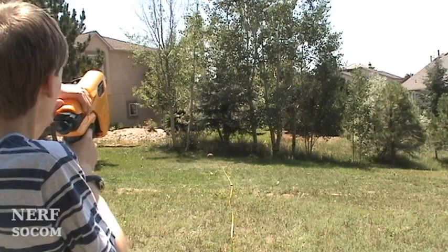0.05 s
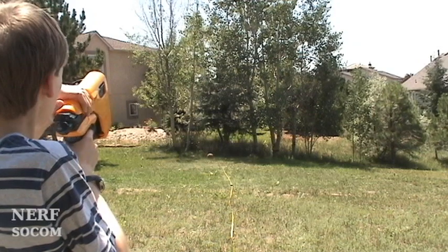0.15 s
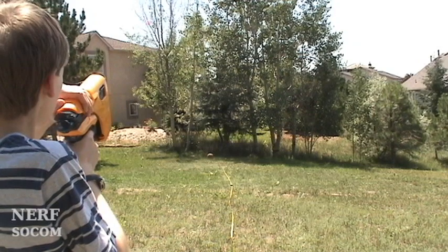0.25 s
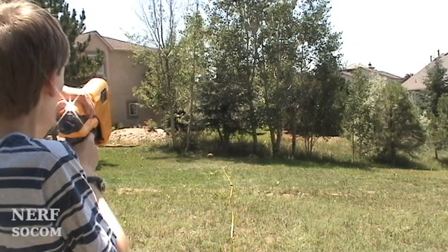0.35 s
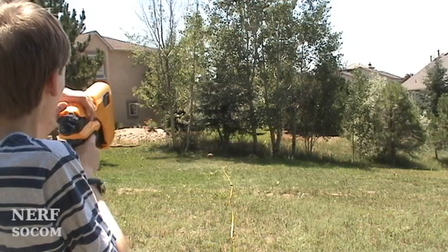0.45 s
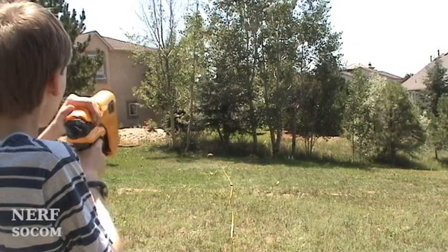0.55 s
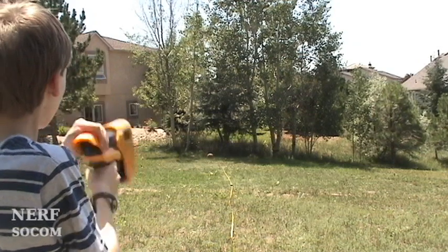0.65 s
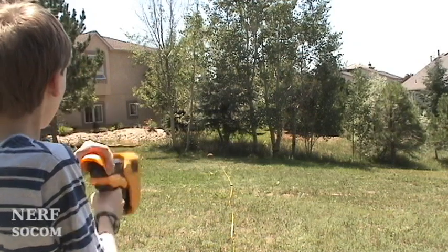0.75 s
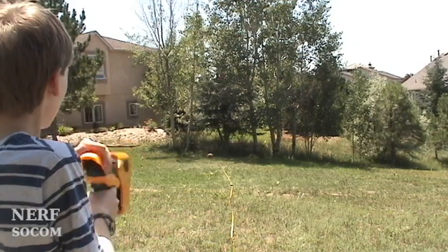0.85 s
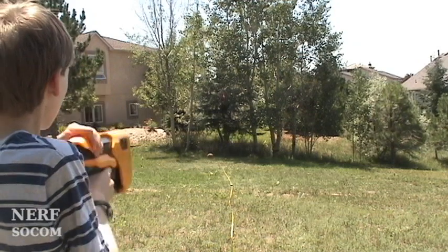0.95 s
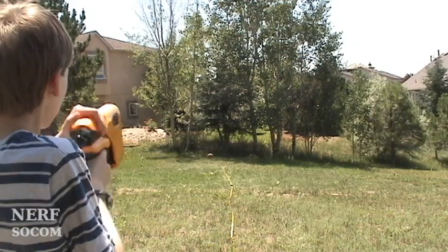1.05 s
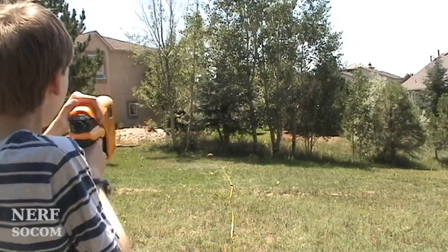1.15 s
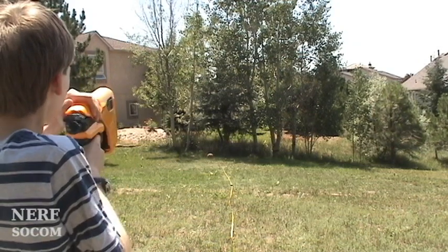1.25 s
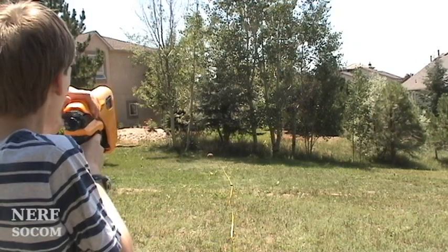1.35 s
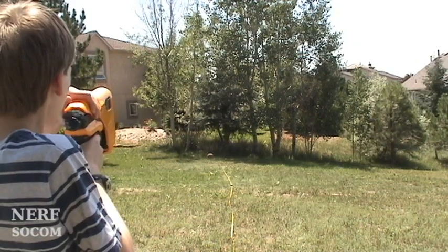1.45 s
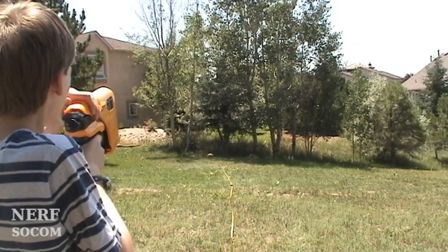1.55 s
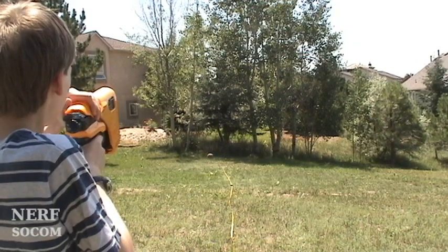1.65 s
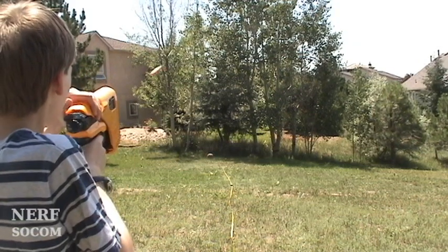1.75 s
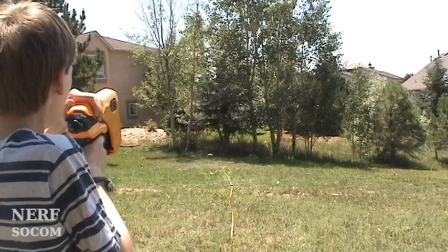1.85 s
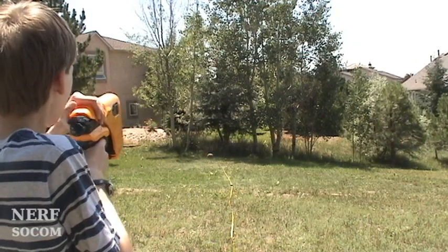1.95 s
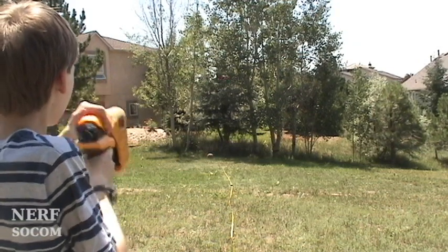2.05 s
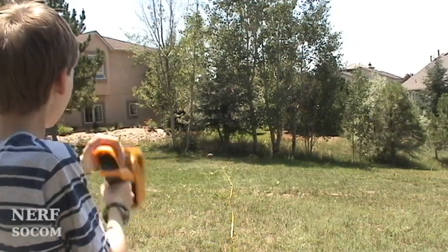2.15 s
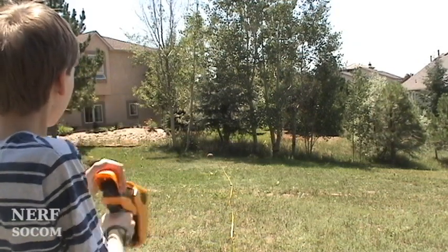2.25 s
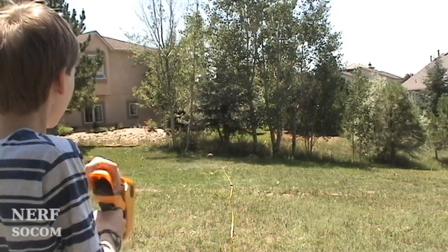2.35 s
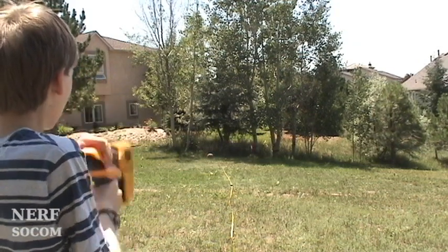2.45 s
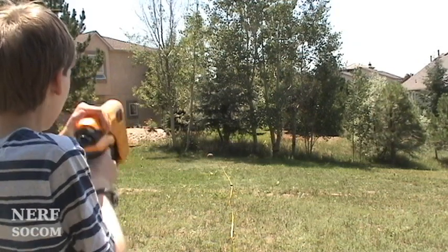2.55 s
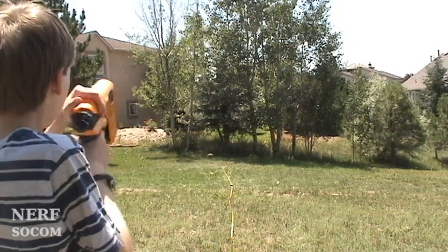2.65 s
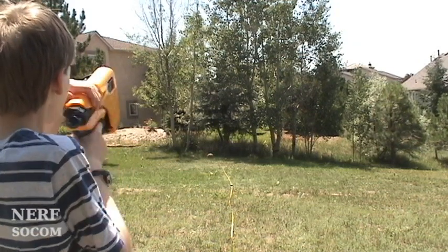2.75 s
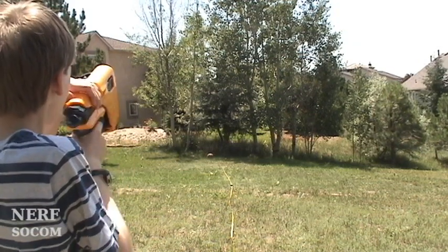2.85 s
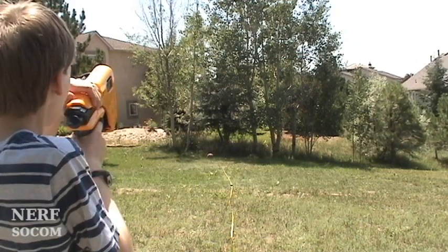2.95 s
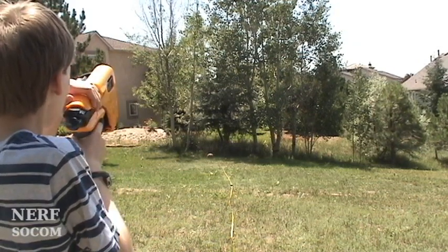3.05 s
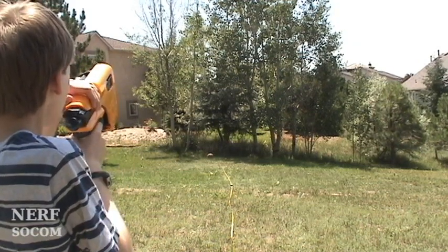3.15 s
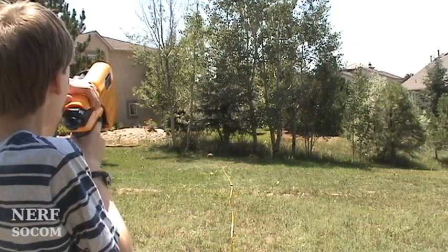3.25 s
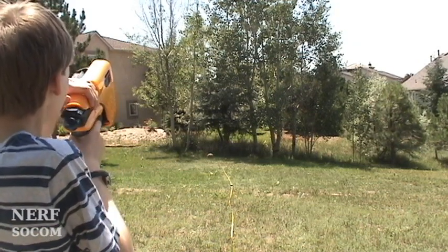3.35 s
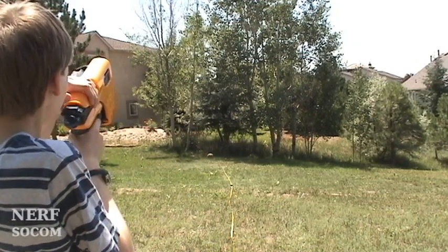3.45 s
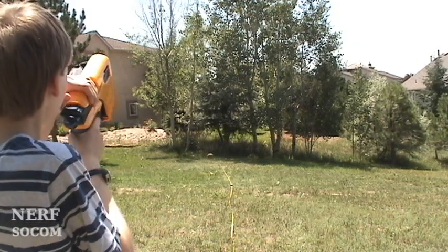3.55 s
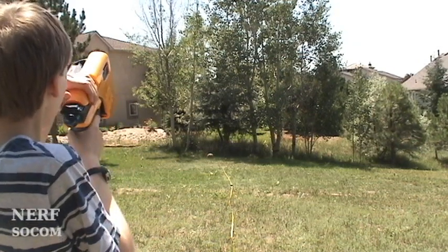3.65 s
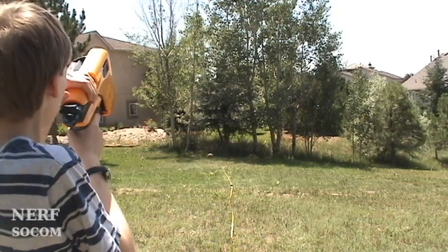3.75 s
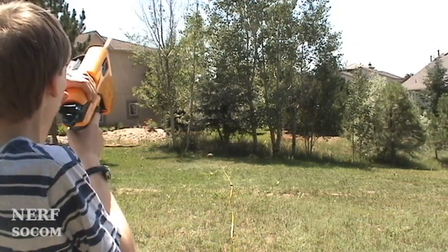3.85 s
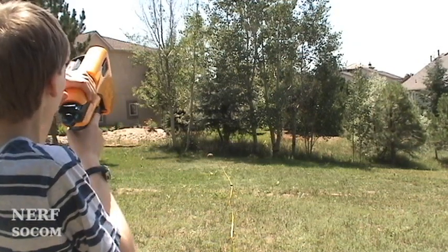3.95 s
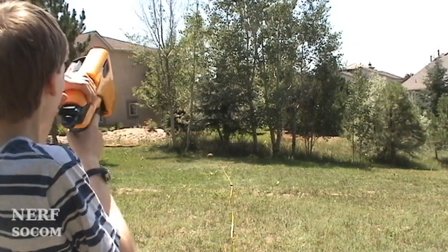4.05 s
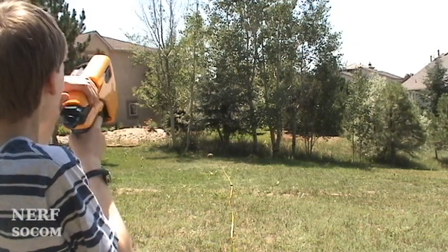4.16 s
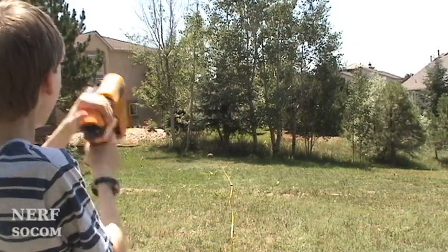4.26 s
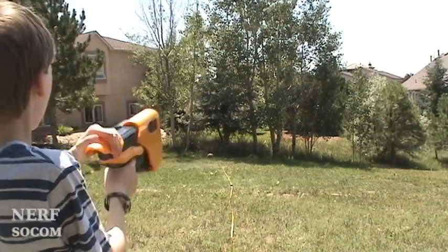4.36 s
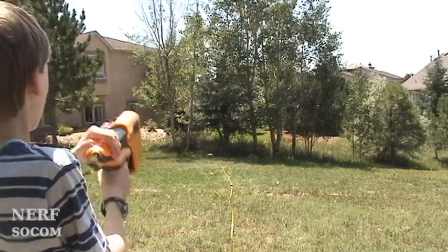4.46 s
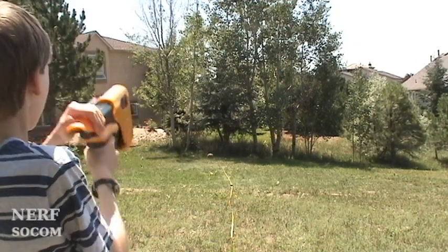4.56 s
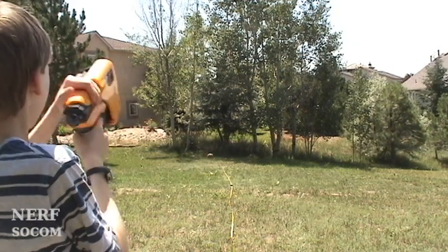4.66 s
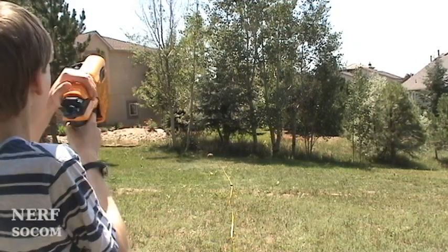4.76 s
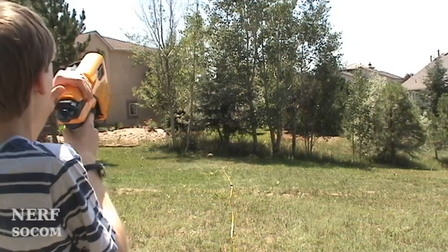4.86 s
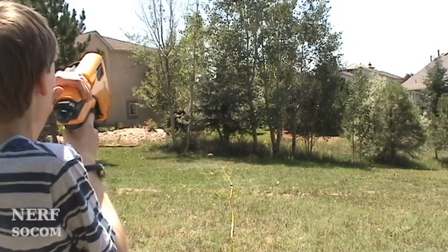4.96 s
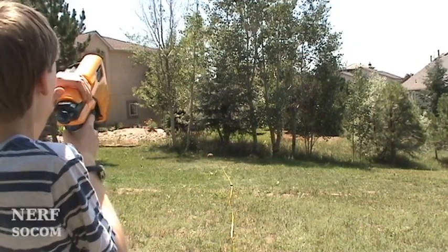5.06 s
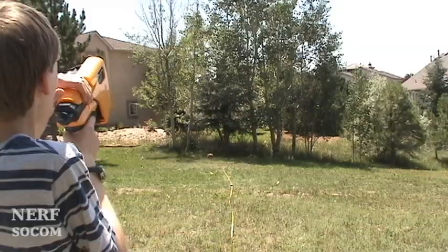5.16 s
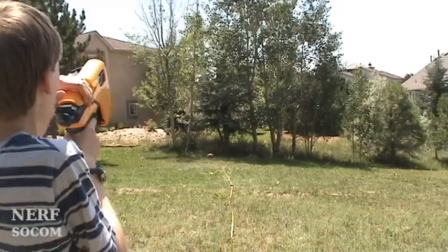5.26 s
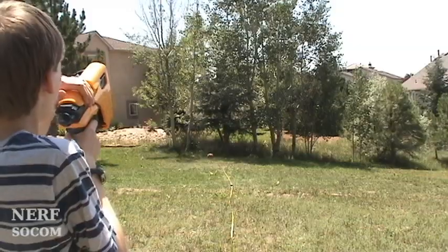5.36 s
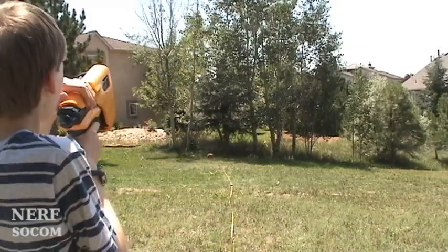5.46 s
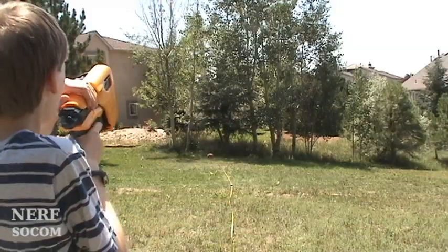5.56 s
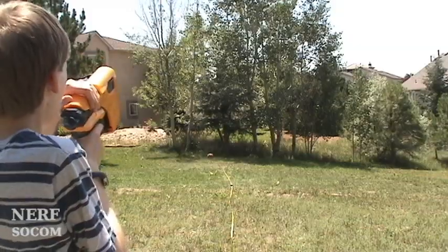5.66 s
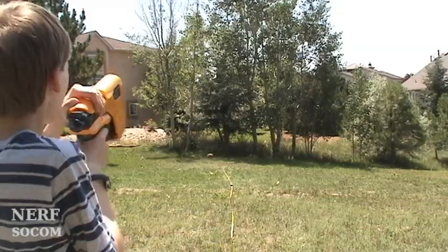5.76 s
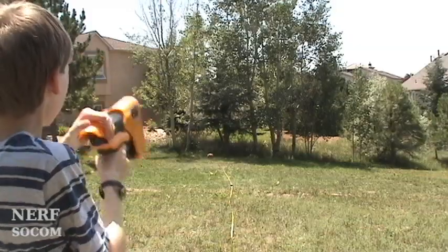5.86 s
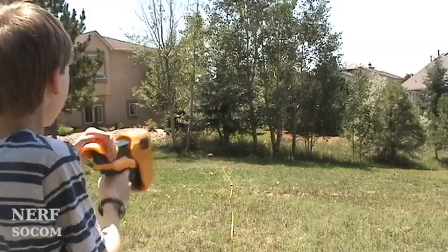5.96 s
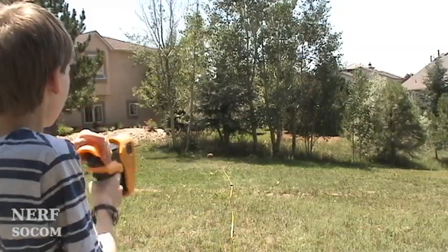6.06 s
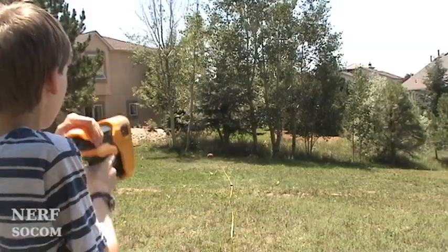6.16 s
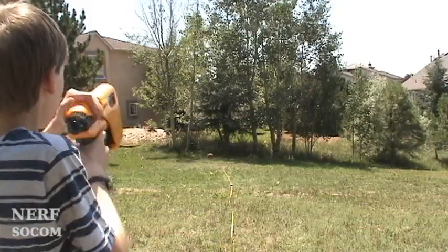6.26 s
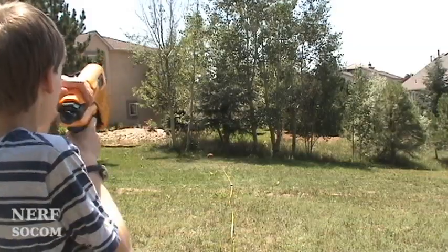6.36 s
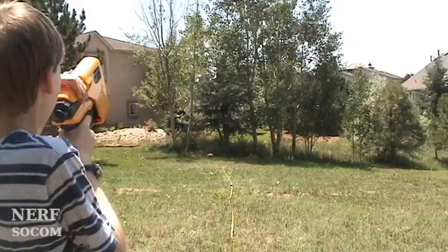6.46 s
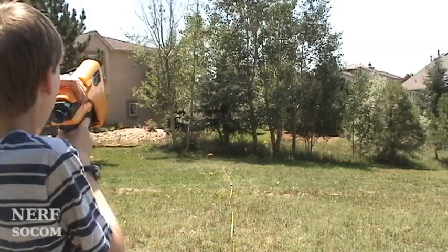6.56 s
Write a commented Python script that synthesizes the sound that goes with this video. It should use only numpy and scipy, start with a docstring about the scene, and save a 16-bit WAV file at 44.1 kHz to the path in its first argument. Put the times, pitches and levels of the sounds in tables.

```python
"""Plastic knocks and a pop of air: a spring-powered dart blaster on a lawn, a metre from the microphone.
It fires four times. The plunger strikes the hollow shell and drives out a dart, and three of the darts
whistle faintly away. After each shot the slide is pulled back and pushed home, scraping and clacking.
Trees and a house wall echo it, over a far hush, a faint hum and a light breeze on the microphone."""
import sys
import numpy as np
from scipy import signal
from scipy.fft import rfft, irfft
from scipy.io import wavfile
from scipy.ndimage import uniform_filter1d

SR = 44100
rng = np.random.default_rng(int(sys.argv[2]) if len(sys.argv) > 2 else 0)


def unload_wav(signal):
    """Save mono or channel-first audio to the path in sys.argv[1] as 16-bit WAV at rate SR, clipped to [-1, 1]."""
    wavfile.write(
        sys.argv[1],
        SR,
        np.round(np.clip(np.atleast_2d(signal).T, -1, 1) * 32767).astype(np.int16),
    )


N = 291060

# Trigger pulls. Each row: release in seconds, strength in dB, dart exit in seconds, air pop in dB,
# barrel pitch in Hz, then relative levels in dB of overtone, low thump and rebound.
SHOTS = [(.2092, -.5, .2205, -17.5, 555, -4, -32, 0), (1.727, -1, 1.741, -11.5, 585, -11, -26, -1),
         (3.8748, 0, 3.889, -13.5, 530, -1, -25.5, -9), (5.4958, 0, 5.511, -10.5, 560, -9, -25.5, -8)]
# Slide pulled back. Each row: unlatching, breech opening and spring catching in seconds,
# the strength of each in dB, rubbing in dB, cavity pitch in Hz.
PULLS = [(.6136, .666, .71, -1, -2.5, 1.5, -2, 460), (2.1328, 2.174, 2.207, -1.5, -.5, 0, 1, 465),
         (4.263, 4.315, 4.352, 1, 1.5, 0, .5, 580), (5.8272, 5.873, 5.9205, 0, 0, -3, .5, 583)]
# Slide pushed home. Each row: dart pickup, breech closing and locking in seconds,
# the strength of each in dB, rubbing in dB, cavity pitch in Hz.
PUSHES = [(1.009, 1.054, 1.089, -3, 1.5, -1, -2.5, 590), (2.509, 2.5369, 2.574, -2, -2, -.5, 1, 540),
          (4.623, 4.664, 4.693, 1, 1, 0, 0, 630), (6.208, 6.234, 6.278, 1, -5, 0, .5, 600)]
PLUNGER_TRAVEL_S = .022  # from the release to the end of the tube


def knocks(cavity_spread=.04):
    """Each blow ticks at the contact, clacks through the thin walls and rings the shell and cavity."""
    wall, body, tick = np.zeros((3, N))
    t = np.arange(SR // 8) / SR
    modes = shell_modes(t)
    for s, wall_db, body_db, tick_db, cavity_hz in blows():
        add(wall, s, undb(wall_db + 1.5) * chatter(t, t60=.038, loose_db=-15, loose_t60=.11))
        add(tick, s, undb(tick_db + 2) * chatter(t, t60=.018, loose_db=-14, loose_t60=.074))
        # the place of the blow decides how strongly, and with which sign, each mode answers
        shell = rng.standard_normal(len(modes)) @ modes
        # the cavity changes shape as the parts move
        hz = cavity_hz * (1 + cavity_spread * rng.uniform(-1, 1))
        add(body, s, undb(body_db) * (undb(4) * ring(t, hz, t60=.043) + undb(-3) * shell))
    return wall, body, tick


def blows():
    """A step always deals the same blows, harder or softer; stray taps fall in between."""
    # Blows on the shell, by step. Each row: delay in seconds, relative levels in dB of wall clack,
    # hollow body and hard tick, cavity pitch ratio.
    step_blows = { "release": [(0, -21.5, -36, -16.5, 1.2), (.0048, -19.5, -29, -14.5, .95)],
                  "plunger": [(0, -18.5, -21, -24, 1.15), (.007, -23, -19.5, -26, .76)],
                  "rebound": [(.0285, -29, -29, -19, .8)], "unlatch": [(0, -32, -36, -31, 1),
                  (.01, -29.5, -32, -31.5, .95), (.021, -29, -28, -32, 1.05)],
                  "open": [(0, -19.5, -18, -26, 1.12), (.0085, -19, -19, -21, 1.17),
                  (.022, -23, -20, -25, .96)], "catch": [(-.007, -18.5, -27, -23, 1.05),
                  (0, -17.5, -21.5, -22, 1)], "pickup": [(-.027, -44, -37, -53, 1), (0, -30, -22, -55, 1),
                  (.012, -30, -27, -50, .9)], "close": [(0, -17, -25, -25.5, 1.1),
                  (.013, -24, -22, -31, .78)], "lock": [(-.012, -22.5, -17.5, -25.5, 1.02),
                  (0, -18, -19, -25.5, .8)]}
    # Trigger and loose parts. Each row: start in seconds, the same three levels, cavity pitch in Hz.
    taps = [(.201, -36, -41, -46, 610), (.248, -31, -21, -35, 425), (.512, -44, -43, -61, 610),
            (.867, -45, -35.5, -59, 450), (1.468, -50, -59, -59, 600), (1.675, -39, -41, -44, 760),
            (2.357, -49, -38, -64, 490), (3.813, -38.5, -43, -49.5, 574), (3.834, -38, -38, -47, 750),
            (4.026, -38.5, -41, -44, 580), (4.4998, -41, -41, -50, 603), (5.698, -37, -45.5, -39, 594),
            (5.975, -32, -30, -42, 485), (5.994, -30, -29, -38, 630)]
    return taps + [(s + delay_s, db + wall_db, db + body_db, db + tick_db, hz * ratio)
                   for name, s, db, hz in steps()
                   for delay_s, wall_db, body_db, tick_db, ratio in step_blows[name]]


def steps():
    """Each step of firing and reloading: name, time in seconds, strength in dB, cavity pitch in Hz."""
    for s, db, exit_s, _, hz, *_, rebound_db in SHOTS:
        yield "release", s, db, hz
        yield "plunger", exit_s, db, hz
        yield "rebound", s, rebound_db, hz
    for names, moves in ((("unlatch", "open", "catch"), PULLS), (("pickup", "close", "lock"), PUSHES)):
        for first_s, middle_s, last_s, *strengths, _, hz in moves:
            for name, s, db in zip(names, (first_s, middle_s, last_s), strengths):
                yield name, s, db, hz


def shell_modes(t):
    """The hollow plastic shell rings briefly, one signal for each mode."""
    # Each row: pitch in Hz, relative level in dB, seconds to fall 60 dB.
    modes = [(403, -9, 0.052), (445, -5, 0.038), (555, -9.5, 0.075), (640, -7.5, 0.074), (724, -5, 0.048),
             (823, -11, 0.022), (1066, -9.5, 0.04), (1310, -24, 0.053)]
    return np.array([undb(db) * ring(t, hz, t60) for hz, db, t60 in modes])


def chatter(t, t60, loose_db, loose_t60):
    """A hard contact and the weaker buzz of loose parts after it."""
    return rng.standard_normal(len(t)) * (fade(t, t60) + undb(loose_db) * fade(t, loose_t60))


def pops(swell_s=.008, overtone_ratio=1.72):
    """The plunger drives out the dart; the barrel rings and the blaster thumps in the hand."""
    out = np.zeros(N)
    t = np.arange(SR // 8) / SR
    air = np.minimum(t / swell_s, 1) * fade(np.maximum(t - swell_s, 0), t60=.05)
    for _, _, exit_s, db, hz, overtone_db, thump_db, _ in SHOTS:
        phase = 2 * np.pi * hz * t
        barrel = np.sin(phase) + undb(overtone_db) * np.sin(overtone_ratio * phase)
        thump = undb(thump_db + 5.5) * (ring(t, hz=170, t60=.054) - ring(t, hz=323, t60=.044))
        add(out, exit_s, undb(db) * air * barrel + thump)
    return out


def rubbing(slips_per_s=1300, scatter_db=3.6, slip_t60=.016, grip_s=.05, grip_db=-18, brighten=.35):
    """Plunger and slide stick and slip on their rails, more softly while the slack is taken up."""
    wall, body, tick = np.zeros((3, N))
    t = np.arange(SR // 4) / SR
    since = t - grip_s
    slip_energy = fade(t[:SR // 50], slip_t60) ** 2
    modes = shell_modes(t)
    for start, end, db, cavity_hz, (first_db, last_db, treble_db, shell_db, slack_db) in strokes():
        slipping = rng.random(len(t)) < slips_per_s / SR
        size, grit, edge = rng.standard_normal((3, len(t)))
        slips = unit(slipping * undb(scatter_db * size))
        friction_db = np.interp(since, [-grip_s, 0, end - start], [first_db + grip_db, first_db, last_db])
        engaged = np.where(since < 0, undb(slack_db), since < end - start)
        force = slips * undb(db + friction_db) * engaged
        grains = np.sqrt(signal.lfilter(slip_energy / slip_energy.sum(), 1, force ** 2))
        shell = rng.choice([-1, 1], len(modes)) @ modes + undb(2) * ring(t, cavity_hz, t60=.062)
        ringing = signal.fftconvolve(force * np.sign(size), shell / np.linalg.norm(shell))
        bright = undb(treble_db) * (grains / undb(-21)) ** brighten  # harder rubbing is brighter
        add(wall, start - grip_s, undb(-2) * grains * grit)
        add(tick, start - grip_s, undb(-2) * bright * grains * edge)
        add(body, start - grip_s, undb(shell_db) * ringing)
    return wall, body, tick


def strokes(lead_s=.016, overrun_s=.003):
    """Each travel of plunger or slide: start and end in seconds, rubbing in dB, cavity in Hz, rub."""
    # Each rub, in relative dB: friction at the start, at the end, gritty treble, shell, slack.
    plunger_rub = (-22, -21, -2.5, -10, -30)
    pull_rub = (-32.5, -18.2, -5, -2.5, -10.5)
    push_rub = (-36, -17, -8.5, -2, -4)
    plunges = [(s, s + PLUNGER_TRAVEL_S, db, hz, plunger_rub) for s, db, _, _, hz, *_ in SHOTS]
    # the slide runs a little past its last click, and moves before it meets the dart
    pulls = [(first, last + overrun_s, db, hz, pull_rub) for first, _, last, *_, db, hz in PULLS]
    pushes = [(first - lead_s, last + overrun_s, db, hz, push_rub)
              for first, _, last, *_, db, hz in PUSHES]
    return plunges + pulls + pushes


def handling(taps_per_shot=10, level_db=-55):
    """Loose parts tap faintly while the blaster is moved between a shot and the end of its reloading."""
    out = np.zeros(N)
    t = np.arange(SR // 16) / SR
    for (shot_s, *_), (_, _, locked_s, *_) in zip(SHOTS, PUSHES):
        for s in rng.uniform(shot_s + PLUNGER_TRAVEL_S, locked_s, taps_per_shot):
            gain = undb(level_db + 2 * rng.standard_normal())
            add(out, s, gain * rng.standard_normal(len(t)) * fade(t, t60=.17))
    return out


def darts(width_hz=110):
    """Air whistles faintly over the tip of a flying dart: a narrow, unsteady band of noise."""
    # Each row: start and end in seconds, first and last pitch in Hz, level in dB.
    flights = [(.28, 0.51, 2230, 2250, -51), (1.80, 2.073, 2100, 2180, -53),
               (5.548, 5.816, 2296, 2300, -57)]
    out = np.zeros(N)
    flutter = unit(band(rng.standard_normal(N), 1, width_hz / 2))
    for start, end, first_hz, last_hz, db in flights:
        i, n = int(start * SR), int((end - start) * SR)
        phase = 2 * np.pi * np.cumsum(np.linspace(first_hz, last_hz, n)) / SR
        add(out, start, undb(db) * flutter[i:i + n] * np.sqrt(np.hanning(n)) * np.sin(phase))
    return out


def outward(shot_db=3.5, slide_db=-2.5):
    """Gain of the sound sent across the lawn: the muzzle throws each shot forward."""
    db = np.full(N, slide_db)
    for start, *_ in SHOTS:
        db[int(start * SR):][:SR // 16] = shot_db
    return undb(db)


def yard(x, tail_db=-30, treble_db=-30, lawn_db=-20, house_s=.107, house_db=-24):
    """The lawn scatters the sound at once; trees and fences add a thin tail, a house wall a dull slap."""
    t = np.arange(SR) / SR
    scattered = []
    for noise in rng.standard_normal(SR) + .58 * rng.standard_normal((2, SR)):  # left, right: partly alike
        low = unit(band(noise, 580, 5700, order=1) * fade(t, t60=1))
        high = unit(noise * fade(t, t60=.4))
        trees = (undb(tail_db) * low + undb(treble_db) * high) * (1 - fade(t, t60=.083))
        lawn = undb(lawn_db) * unit(rng.standard_normal(SR) * fade(t, t60=.041))
        scattered.append(signal.fftconvolve(x, (trees + lawn) / np.sqrt(SR))[:N])
    slap = np.zeros(N)
    add(slap, house_s, undb(house_db) * band(x, 1040, 2040, order=1))
    return np.array(scattered) + slap


def breeze():
    """Wind on the microphone: both sides share a rumble, while the slowest eddies meet each alone."""
    # Each row: time in seconds, relative level in dB.
    gusts = [(0.0, -42), (0.13, -46), (0.48, -35), (0.51, -46), (0.81, -52), (0.84, -45), (2.72, -49),
             (2.76, -40), (2.85, -48), (3.46, -47), (3.49, -41), (3.8, -47), (5.46, -48), (5.51, -39),
             (5.55, -55), (5.66, -45), (6.6, -49)]
    rumble = unit(band(rng.standard_normal(N), 40, 90))
    eddies = np.array([unit(band(rng.standard_normal(N), 20, 54)) for _ in range(2)])
    gust_db = np.interp(np.arange(N) / SR, *np.transpose(gusts))
    return (rumble + eddies) * undb(gust_db - 3.5 + 1.5 * drift(7))


def hush(level_db=-45, side_db=-5):
    """The far outdoors: a wide, low hush that swells a little."""
    # Each row: frequency in Hz, relative level in dB.
    spectrum = [(30, -10), (70, -5.5), (120, -11.5), (200, -19.5), (350, -21), (600, -21), (1000, -23),
                (2670, -37), (4000, -44), (5600, -54.5), (8500, -46), (13000, -42), (16000, -43.5)]
    mid, side = (colour(rng.standard_normal(N), spectrum)
                 * undb(level_db + .5 * drift(2.5) + .27 * drift(7.1)) for _ in range(2))
    return mid + undb(side_db) * np.array([side, -side])


def hum(hz=149, level_db=-53):
    """A faint low tone wavers in level and pitch."""
    t = np.arange(N) / SR
    return undb(level_db + 1.9 * drift(5)) * np.sin(2 * np.pi * hz * t + .76 * drift(11))


def undb(db):
    """Decibels to gain."""
    return 10 ** (np.asarray(db) / 20)


def unit(x):
    """Scale to rms 1."""
    return x / np.sqrt(np.mean(x ** 2))


def add(track, s, sound):
    """Mix a sound into a track at s seconds."""
    i = max(int(s * SR), 0)
    track[i:i + len(sound)] += sound[:max(N - i, 0)]


def colour(x, points, size=1024):
    """Causal filter of unit power, shaped by points of frequency in Hz and relative level in dB."""
    hz, db = np.transpose(points)
    bins_hz = np.arange(size + 1) * SR / 2 / size
    gain = undb(np.interp(np.log(bins_hz + 1), np.log(hz), db))
    cepstrum = irfft(np.log(gain))
    causal = 2 * cepstrum * (np.arange(2 * size) < size)
    response = irfft(np.exp(rfft(causal)))[:size]
    return signal.oaconvolve(x, response / np.linalg.norm(response))[:N]


def band(x, lo_hz, hi_hz, order=2):
    """Band-pass filter."""
    return signal.sosfilt(signal.butter(order, [lo_hz, hi_hz], "band", fs=SR, output="sos"), x + 1e-18)


def drift(rate_hz):
    """Smooth random drift of rms 1."""
    k = int(SR / rate_hz)
    stairs = np.repeat(rng.standard_normal(N // k + 1), k)
    return unit(uniform_filter1d(uniform_filter1d(stairs, k), k)[:N])


def fade(t, t60):
    """Exponential decay by 60 dB in t60 seconds."""
    return np.exp(-np.log(1000) * t / t60)


def ring(t, hz, t60):
    """One struck mode."""
    return np.sin(2 * np.pi * hz * t) * fade(t, t60)


def scene(wall_pan_db=.27, body_pan_db=1, tick_pan_db=-.26, lag_samples=.27, glance_db=-17):
    """The blaster is just left of centre; its treble reaches the microphone's two sides differently."""
    # Contact noise of wall clack and hard tick. Each row: frequency in Hz, relative level in dB.
    wall_spectrum = [(100, -12.5), (280, -8), (420, 1.5), (800, 3), (1400, 0), (1900, 1), (2400, -3),
                     (2850, -1), (3100, -2.5), (3450, -4), (4200, -12), (5600, -27), (9000, -32)]
    tick_spectrum = [(2000, -22.5), (5600, -21), (7000, -8.5), (8700, -1.5), (10800, 1), (12500, -1),
                     (14000, -7), (16000, -7.5)]
    wall, body, tick = np.add(knocks(), rubbing())
    taps = handling()
    wall = colour(wall + taps, wall_spectrum)
    body = band(body, 345, 2200, order=3) + pops()
    tick = colour(tick + undb(-8) * taps, tick_spectrum) * undb(1)
    sides = np.array([[1], [-1]])  # left, right
    right_tick = (1 - lag_samples) * tick + lag_samples * np.roll(tick, 1)
    glance = undb(glance_db) * sides * np.roll(tick, SR // 3000)  # off the microphone's housing
    ticks = (np.array([tick, right_tick]) + glance) * undb(tick_pan_db * sides)
    direct = wall * undb(wall_pan_db * sides) + body * undb(body_pan_db * sides) + ticks
    echoes = yard((wall + body + tick) * outward())
    whistles = darts()
    outdoors = (hush() + hum() + breeze()) * undb(-.5 * sides)  # leans to the right
    return direct + echoes + whistles + outdoors


def record(dry, ceiling=.7, top_hz=16000):
    """The recorder rounds the highest peaks and cuts the top."""
    rounded = ceiling * np.tanh(dry / ceiling)
    return signal.sosfilt(signal.ellip(10, .2, 80, top_hz, fs=SR, output="sos"), rounded)


dry = scene()
out = record(dry)
unload_wav(out)
```